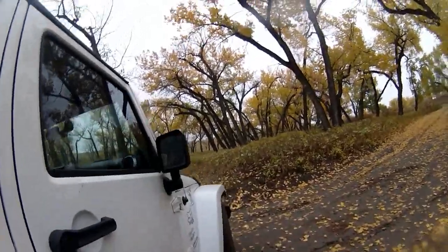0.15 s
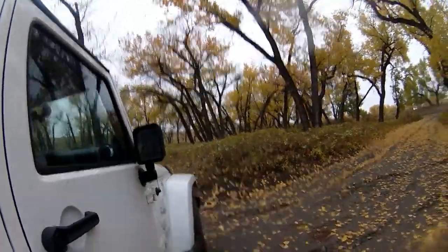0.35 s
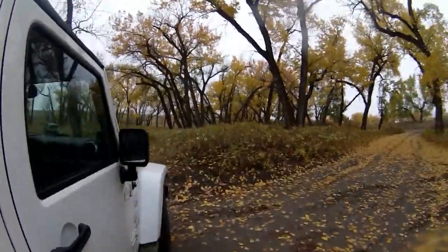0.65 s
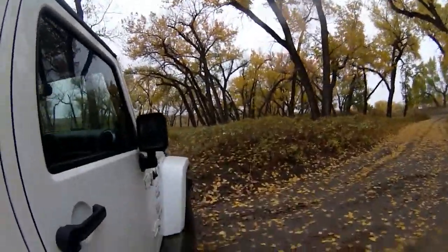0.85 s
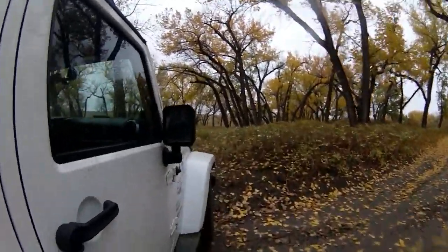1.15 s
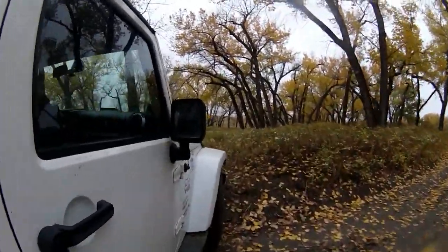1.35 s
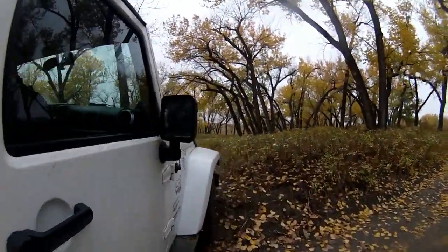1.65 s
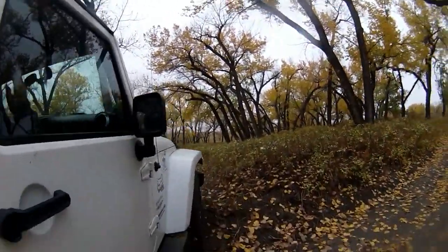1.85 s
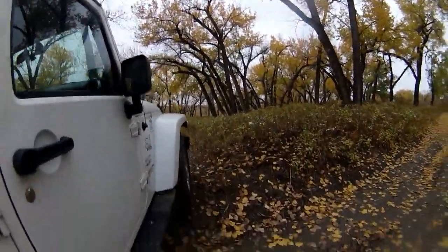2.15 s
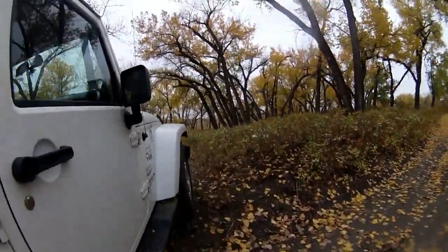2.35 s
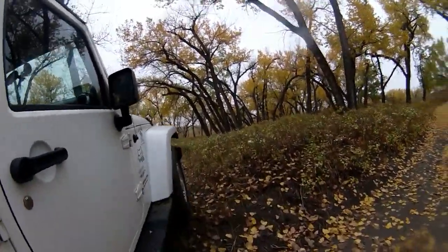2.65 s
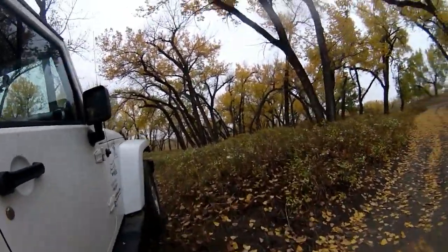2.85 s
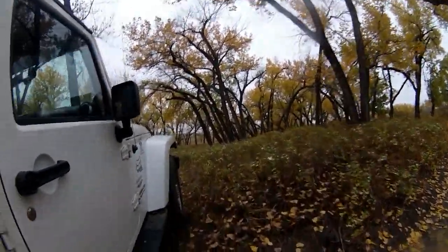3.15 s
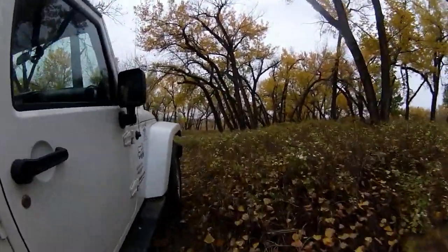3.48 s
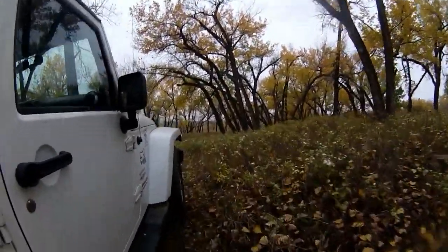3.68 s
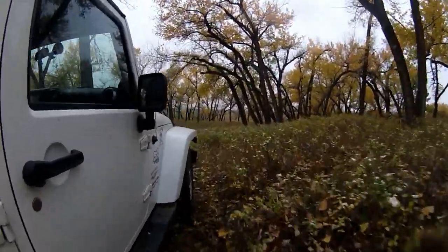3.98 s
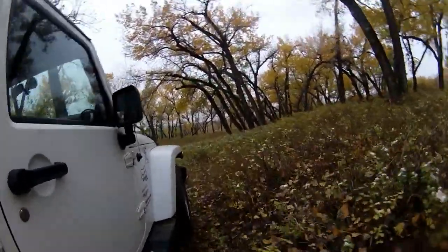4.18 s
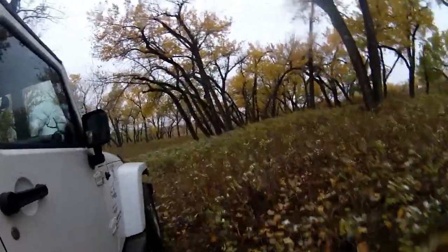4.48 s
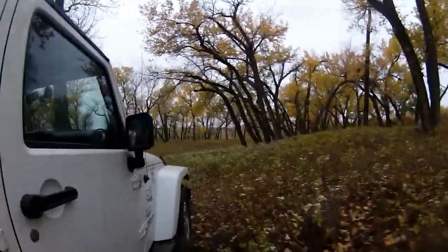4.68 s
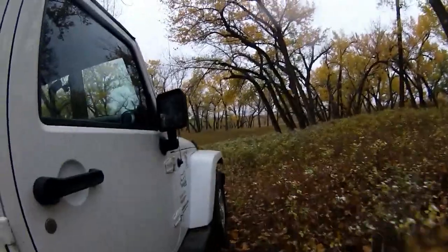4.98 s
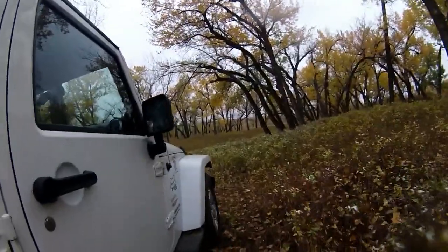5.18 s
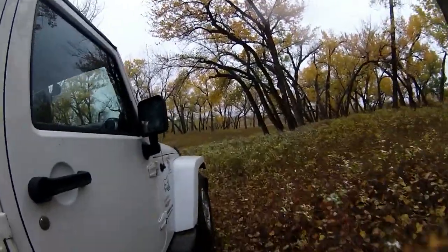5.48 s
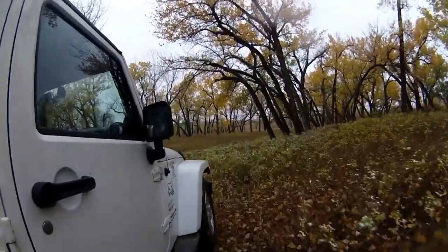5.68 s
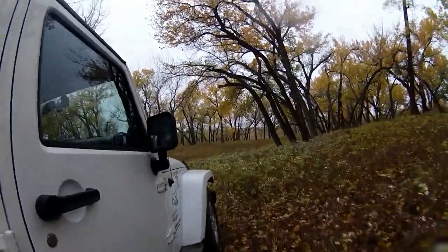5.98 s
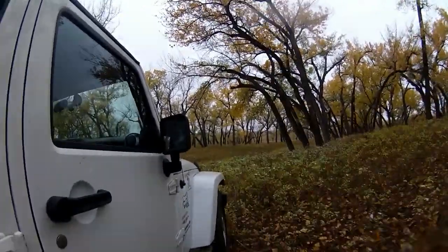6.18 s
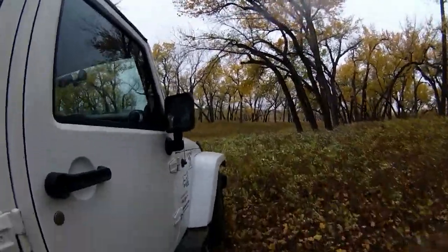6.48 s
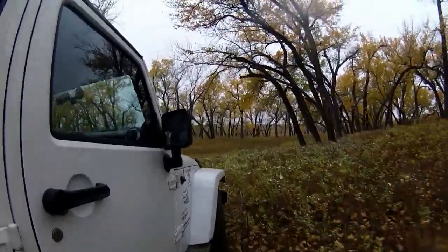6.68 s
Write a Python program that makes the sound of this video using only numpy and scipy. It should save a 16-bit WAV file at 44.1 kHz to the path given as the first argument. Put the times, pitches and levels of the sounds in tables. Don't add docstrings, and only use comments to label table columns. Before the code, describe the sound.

An engine mutters at low idle while tyres crackle over leaves on a track. It surges, wavers at high revs, sinks, then surges again, overlapped by another engine's deep drone. Gear hums glide beneath, and thin belt squeaks appear as revs fall. The vehicle then idles over grass with a brief second swell from the other engine. Close, boxy, bass-heavy outdoor sound with dull, gritty treble from an enclosed microphone.

```python
import sys
import numpy as np
from scipy import signal
from scipy.io import wavfile
from scipy.ndimage import uniform_filter1d, map_coordinates

SR = 44100
rng = np.random.default_rng(int(sys.argv[2]) if len(sys.argv) > 2 else 0)


def generate_wav(signal):
    frames = np.transpose(np.atleast_2d(signal))
    scaled = np.clip(frames, -1, 1) * 32767
    pcm = np.round(scaled).astype(np.int16)
    wavfile.write(sys.argv[1], SR, pcm)


def linear_from_db(decibels):
    return 10 ** (np.asarray(decibels, float) / 20)


N = 301203
T = np.arange(N) / SR

# (t/s, firing rate/Hz)
OWN_SPEED = [(1.52, 34.05), (1.63, 36.66), (1.92, 70), (2.04, 80.06), (2.2, 71.5), (2.35, 84), (2.48, 82.5),
             (2.67, 93.55), (2.83, 75.1), (3.07, 53), (3.2, 39.08), (3.53, 33.38), (3.72, 49.53),
             (4.22, 91.4), (4.55, 58.26), (4.97, 37.96), (5.45, 40.92), (6.83, 33.94)]
# (f/Hz, density/dB per Hz)
ROAR_SPECTRUM = [(190, -17), (330, -2), (456, -3), (616, -6.5), (702, -9), (1490, -13), (1700, -15),
                 (2210, -15), (3740, -120)]
# (f/Hz, density/dB per Hz)
HISS_SPECTRUM = [(1100, -36.5), (1500, -16.5), (2000, -6.5), (2550, 0.2), (3050, -9), (3500, -13.5),
                 (4200, -21.5)]
# (f/Hz, density/dB per Hz)
SIZZLE_SPECTRUM = [(2800, -41.5), (3600, -8), (4600, 0), (5200, -1.5), (5900, -2), (6500, -42)]


def unit(x):
    return x / np.sqrt(np.mean(x ** 2) + 1e-20)


def along(points, hz):
    f, v = np.transpose(points)
    return np.interp(np.log(hz + 1), np.log(f + 1), v)


def curves(rows):
    s, *cols = np.transpose(rows)
    return [np.interp(T, s, c) for c in cols]


def span(start, end, fade):
    return np.clip(np.minimum(T - start, end - T) / fade + 0.5, 0, 1)


def wobble(rate):
    knots = rng.standard_normal(int(N * rate / SR) + 4)
    return map_coordinates(knots, [T * rate], order=3)


def noise(spectrum, patchy_db):
    hz, _, z = signal.stft(rng.standard_normal(N), SR, nperseg=2048)
    field = uniform_filter1d(rng.standard_normal(z.shape), size=14, axis=0)
    field = uniform_filter1d(field, size=2, axis=1)
    gain = linear_from_db(along(spectrum, hz)[:, None] + patchy_db * unit(field))
    return unit(signal.istft(z * gain, SR, nperseg=2048)[1][:N])


def tone(turns, level_db, rough_db, drift):
    size = np.sqrt(2) * linear_from_db(level_db + rough_db * wobble(28))
    return -size * np.cos(2 * np.pi * turns + drift * wobble(9))


def engine(speed, effort_db, orders, lift_db, count, upper_db, halves_db, rough_db):
    # (f/Hz, gain/dB)
    upper_gain = [(150, -24), (210, -10), (290, -7.5), (320, -27), (360, -24.5), (500, -36), (1000, -34.5)]
    # (f/Hz, gain/dB)
    halves_gain = [(15, -44), (50, -43), (130, -21.5), (220, -24), (310, -31), (400, -36), (600, -65)]
    rate = uniform_filter1d(speed, size=int(0.049 * SR) + 1, mode="nearest")
    lifted = np.clip(-np.gradient(rate) * SR / 31, 0, 1)
    lifted = uniform_filter1d(lifted, size=6600, origin=3200)
    at, *gains = np.transpose(orders)
    low = [effort_db + np.interp(rate, at, gain) + lift * lifted for gain, lift in zip(gains, lift_db)]
    load_db = 10 * np.log10(sum(linear_from_db(db) ** 2 for db in low))
    turns = np.cumsum(rate) / SR
    lag = 0.3 * np.exp(-((rate - 70) / 8) ** 2)
    sound = np.zeros(N)
    for k, db in enumerate(low, 1):
        sound += tone(k * turns - lag, db, rough_db, drift=0.25)
    for k in range(len(low) + 1, count + 1):
        level_db = load_db + upper_db + along(upper_gain, k * rate)
        sound += tone(k * turns, level_db, rough_db=3.5, drift=0.9)
    for k in np.arange(count) + 0.5:
        level_db = load_db + halves_db + along(halves_gain, k * rate)
        sound += tone(k * turns, level_db, rough_db=6.0, drift=1.0)
    return sound, turns


def own_engine(effort_db):
    # (firing rate/Hz, then 1st, 2nd, 3rd, 4th order over effort/dB)
    own_orders = [(33.75, -13, -9, -2.5, 1.1), (40, -6, -10, 1.1, -13.5), (51.4, -3.5, 0.2, -11, -11.5),
                  (61.4, -5.5, -1, -14.5, -11.5), (70, -0.5, 0.3, -6.5, -10), (76, -6, -2.5, -8, -8),
                  (84, 0.6, -4.5, -7, -25), (90.58, -3.3, -7.5, -4, -32)]
    own_lift_db = [-9, -0.5, -1.5, -3]
    speed, = curves(OWN_SPEED)
    return engine(speed, effort_db, own_orders, own_lift_db, count=13,
                  upper_db=-12.5, halves_db=-6.5, rough_db=1.6)


def swells(turns):
    # (from t/s, to t/s, order, level/dB)
    singing_orders = [(.1, 1.6, 6, -42), (1.62, 1.7, 7, -40), (1.78, 1.86, 5, -38), (1.96, 2.3, 5, -36),
                      (1.98, 2.1, 5.5, -39), (2.0, 2.1, 10.8, -46), (2.33, 2.54, 6, -39),
                      (2.5, 2.78, 4, -41), (2.25, 2.42, 9, -49), (2.53, 2.67, 8, -45), (2.55, 2.66, 7, -47),
                      (2.51, 2.64, 9, -46), (2.56, 2.68, 10, -47), (2.5, 2.72, 5.5, -46),
                      (3.57, 3.65, 7, -37), (3.65, 3.72, 6, -35), (3.72, 3.88, 5, -35),
                      (4.08, 4.14, 9, -48), (4.05, 4.2, 6, -50), (2.3, 2.76, 2.5, -34),
                      (2.4, 2.7, 1.5, -36), (2.4, 2.7, 3.5, -39), (5.3, 5.63, 5, -43), (5.32, 5.6, 7, -47),
                      (5.4, 5.6, 6, -48)]
    sound = np.zeros(N)
    for start, end, order, db in singing_orders:
        sound += span(start, end, fade=0.041) * tone(order * turns, db, rough_db=2.0, drift=0.61)
    return sound


def other_engine():
    # (t/s, firing rate/Hz, level/dB)
    other_swells = [
        [(4.05, 72.8, -33), (4.24, 71.96, -24.5), (4.45, 84.3, -21), (4.55, 89.4, -18.5), (4.66, 96.64, -22),
         (4.9, 101.5, -21), (5.14, 103.2, -22), (5.35, 87, -34), (5.55, 81.5, -46)],
        [(5.65, 62.86, -49), (5.85, 56.8, -40), (6.05, 54.5, -31), (6.15, 58.56, -33.5), (6.35, 76, -24.5),
         (6.45, 79.5, -23), (6.56, 74, -34.5), (6.65, 65, -38.5), (6.83, 64, -35.5)],
    ]
    # (firing rate/Hz, then 1st, 2nd, 3rd order over level/dB)
    other_orders = [(53.8, -5, 2, -24), (65, 1.3, -10, -25), (73, 2.7, -15, -30), (79.5, 0, -9.5, -36),
                    (87.1, 0.5, -15, -36), (96, 0.6, -18.5, -26.5)]
    other_lift_db = [-0.3, 8.5, -0.5]
    rows = other_swells[0] + other_swells[1]
    speed, level_db = curves(rows)
    sound, _ = engine(speed, level_db, other_orders, other_lift_db, count=4,
                      upper_db=-17.0, halves_db=-7.5, rough_db=1.5)
    start = rows[0][0]
    return span(start, rows[-1][0], fade=0.1) * sound, start, level_db


def leaves():
    # (t/s, level/dB, brightness/dB, thud/dB)
    tick_hits = [(0.605, -48, -7, 7.5), (0.623, -59, 11, 1), (0.795, -38.5, -2.5, -6),
                 (0.869, -57, 14.5, 11), (3.77, -47.5, -3, 5), (5.549, -54, 8, 1), (5.623, -47, -4, -4),
                 (5.784, -46, 4, -6), (6.169, -56.5, 13, -4), (6.348, -50, -1, 1), (6.458, -48, 7, -5)]
    snap_hits = [(0.803, -47, -3, -5), (0.204, -59, 6, -2.1), (0.326, -52, 9, -9), (0.6415, -46.5, 0, -3),
                 (0.687, -59, 16, 5), (0.722, -42.5, -2, -6), (0.905, -46.5, -0.5, -6),
                 (1.098, -40.5, 3, 3), (1.12, -47, -6, 5), (3.93, -46.5, -14, 4), (4.687, -53, -10, 8),
                 (4.803, -42, -6, -7), (4.93, -51, -20, -2), (5.99, -56, 8.5, -7), (6.293, -45, -0.5, -19)]
    crunch_hits = [(0.4, -47.5, 7.5, -2), (0.603, -51.5, 8.5, 12), (1.082, -48.5, 2, 6.5),
                   (2.55, -51, -5, 15), (2.6, -51, -8, 12), (3.08, -57, -9, 14), (3.63, -49.5, 0, 10),
                   (3.655, -50, -1, 11), (4.1, -43.5, -7, 7), (4.25, -53, -5, 10), (6.497, -45.5, -4, -6)]
    low, high, thud = np.zeros((3, N))
    for rise_s, hits in ((0.003, tick_hits), (0.0083, snap_hits), (0.012, crunch_hits)):
        for s, db, bright_db, thud_db in hits:
            u = np.clip((T - s) / rise_s, 0, 30)
            shape = linear_from_db(db + 4) * np.sqrt(u) * np.exp(-u / 1.39)
            low += shape
            high += linear_from_db(bright_db) * shape
            thud += linear_from_db(thud_db) * shape
    grain = unit(linear_from_db(1.6 * wobble(450)))
    crackle = low * noise(HISS_SPECTRUM, patchy_db=-1.8) + high * noise(SIZZLE_SPECTRUM, patchy_db=-5.5)
    return grain * crackle + thud * noise(ROAR_SPECTRUM, patchy_db=2.4)


def driveline():
    # (t/s, pitch f/Hz, level/dB)
    gear_hums = [
        [(0, 80, -31.5), (.1, 75.5, -33), (.22, 74.5, -57)],
        [(1.05, 138, -42), (1.2, 159.2, -35.5), (1.4, 186.7, -40.5), (1.58, 214.7, -49)],
        [(1.6, 304, -48.5), (1.72, 285.2, -39.5), (1.85, 286, -38.5)],
        [(2.3, 320.8, -29.5), (2.55, 310.5, -36.5), (2.8, 310.6, -31), (2.93, 285.5, -29)],
        [(2.72, 385.2, -42), (3.0, 388, -48)],
        [(3.8, 360, -44.5), (4.05, 384, -43)],
        [(3.03, 114.3, -35), (3.15, 113, -37), (3.25, 115, -50)],
        [(4.28, 393.2, -40), (4.42, 388.2, -45.5)],
        [(5.72, 126.3, -44), (5.86, 135.8, -34), (6.0, 139.8, -36), (6.1, 133.1, -36.5), (6.22, 111.5, -29)],
        [(6.6, 125.7, -46), (6.7, 130.9, -47), (6.83, 127, -32.5)],
    ]
    hum = np.zeros(N)
    for rows in gear_hums:
        pitch, db = curves(rows)
        gate = span(rows[0][0], rows[-1][0], fade=0.091)
        hum += gate * tone(np.cumsum(pitch) / SR, db, rough_db=1.6, drift=0.2)
    return hum


def squeal():
    # (from t/s, to t/s, from f/Hz, to f/Hz, level/dB)
    whistles = [
        (2.64, 2.72, 2370, 2480, -51),
        (2.75, 2.89, 2260, 2400, -50),
        (4.15, 4.25, 2440, 2540, -54),
        (4.29, 4.37, 2280, 2300, -53),
        (4.38, 4.5, 2370, 2520, -52),
    ]
    sound = np.zeros(N)
    for start, end, low_hz, high_hz, db in whistles:
        pitch = np.interp(T, [start, end], [low_hz, high_hz]) + 25 * wobble(60)
        sound += span(start, end, fade=0.04) * tone(np.cumsum(pitch) / SR, db, rough_db=3, drift=0.5)
    return sound


def road(turns, effort_db):
    # (t/s, level/dB)
    churn_points = [(0, -53.5), (.64, -48.5), (.95, -52.5), (1.5, -50), (1.88, -49), (1.99, -42),
                    (2.26, -42), (2.45, -40.5), (2.8, -42.5), (2.95, -48), (3.27, -52.5), (3.96, -52.5),
                    (4.25, -42.5), (4.4, -43.5), (4.78, -53), (6.1, -54.5), (6.45, -52.5), (6.83, -53)]
    # (calm level/dB, growth with churn, extra on the track/dB, growth with effort)
    layer_mix = [(-36, 0.24, 0, 0.16), (-54, 0.52, 3.5, 0.22), (-50.5, 0.9, 0.4, -0.012),
                 (-52.5, 0.63, 2.5, -0.1)]
    # (f/Hz, density/dB per Hz)
    rumble_spectrum = [(8.8, -64), (15, -18.5), (86, 6), (99, 7), (118, 4.5), (167, 2), (365, -22.5),
                       (420, -34), (550, -41), (920, -120)]
    churn_db = curves(churn_points)[0] + 51.5
    gravel = np.clip((3.05 - T) / 0.56 + 0.5, 0, 1)
    pull_db = effort_db - effort_db.min()
    rumble_db, roar_db, hiss_db, sizzle_db = (
        calm + grows * churn_db + track * gravel + pulls * pull_db for calm, grows, track, pulls in layer_mix)
    acceleration = uniform_filter1d(np.gradient(curves(OWN_SPEED)[0]), size=4000) * SR
    coasting = np.clip(-acceleration / 100, 0, 1)
    roar_db = roar_db - 2 * coasting * gravel
    shake = 0.86 * wobble(9) + 0.68 * wobble(30)
    puff = 0.5 * np.cos(2 * np.pi * turns)
    roar_flutter = linear_from_db(shake + 2.0 * puff + 0.8 * wobble(14))
    hiss_flutter = linear_from_db(shake + puff + 0.27 * wobble(70))
    sizzle_flutter = linear_from_db(shake + puff + 0.68 * wobble(23))
    rumble = linear_from_db(rumble_db) * noise(rumble_spectrum, patchy_db=1.5)
    roar = linear_from_db(roar_db) * unit(roar_flutter * noise(ROAR_SPECTRUM, patchy_db=1.0))
    hiss = linear_from_db(hiss_db) * unit(hiss_flutter * noise(HISS_SPECTRUM, patchy_db=1.0))
    sizzle = linear_from_db(sizzle_db) * unit(sizzle_flutter * noise(SIZZLE_SPECTRUM, patchy_db=1.5))
    return rumble + roar + hiss + sizzle


def panels():
    # (f/Hz, width/Hz, level/dB)
    resonances = [
        (467, 42, -50.5),
        (636, 42, -56.5),
    ]
    buzz = np.zeros(N)
    for hz, w, db in resonances:
        peak = [(hz - 2 * w, -40), (hz - w / 2, -4), (hz, 0), (hz + w / 2, -4), (hz + 2 * w, -40)]
        buzz += linear_from_db(db) * noise(peak, patchy_db=3.5)
    return span(-1, 1.65, fade=0.34) * buzz


def channel_noise(mid):
    # (f/Hz, density/dB per Hz)
    side_spectrum = [(18, -26), (30, 2), (55, -4), (241, -11), (1700, -23), (3600, -34), (6000, -35),
                     (7800, -90), (13200, -120)]
    loudness = np.sqrt(np.abs(uniform_filter1d(mid ** 2, size=4000)))
    return linear_from_db(-43) * loudness * noise(side_spectrum, patchy_db=8)


def scene():
    # (t/s, level/dB)
    effort_points = [(0, -41.5), (.4, -31), (1.5, -34), (1.78, -17.5), (2.06, -17.5), (2.25, -13.5),
                     (2.4, -20), (2.56, -14), (2.85, -21.5), (3.04, -28.5), (3.14, -36), (3.5, -31.5),
                     (3.72, -17), (4.13, -18), (4.42, -23.5), (4.65, -40), (5.5, -35), (6.83, -44)]
    effort_db, = curves(effort_points)
    own, turns = own_engine(effort_db)
    other, other_start, other_db = other_engine()
    work_db = np.maximum(effort_db, np.where(T > other_start, other_db + 3, -60))
    mid = own + swells(turns) + other + leaves() + driveline() + squeal() + road(turns, work_db) + panels()
    side = channel_noise(mid)
    return np.array([mid + side, mid - side])


def thin_treble(x):
    # (t/s, treble thinned above f/Hz)
    gaps = [
        (.306, 800),
        (.522, 800),
        (.668, 1200),
        (.925, 900),
        (1.355, 2600),
        (2.846, 800),
    ]
    hz, t, z = signal.stft(x, SR, nperseg=640, noverlap=576)
    for s, edge_hz in gaps:
        frames = np.abs(t - s) < 0.009
        size = np.abs(z[0][:, frames]).mean(axis=1)
        size /= np.sqrt(uniform_filter1d(size, size=12))
        treble = (hz > edge_hz) & (hz < 6500)
        lost = treble & (size < np.quantile(size[treble], 0.77))
        z[:, lost] *= 1 - 0.96 * frames
    return signal.istft(z, SR, nperseg=640, noverlap=576)[1][:, :N]


def top_cut(x):
    return signal.sosfilt(signal.butter(12, 16420, fs=SR, output="sos"), x)


def record(dry):
    guard = signal.butter(8, 5700, fs=SR, output="sos")
    guarded = signal.sosfiltfilt(guard, thin_treble(dry))
    slow = signal.resample_poly(guarded, 40, 147, axis=1)
    held = np.repeat(slow, 4, axis=1)
    held = signal.resample_poly(held, 147, 160, axis=1)[:, :N]
    top = signal.ellip(10, 0.1, 70, 15330, fs=SR, output="sos")
    return top_cut(signal.sosfiltfilt(top, held))


dry = scene()
out = record(dry)
generate_wav(out)
```